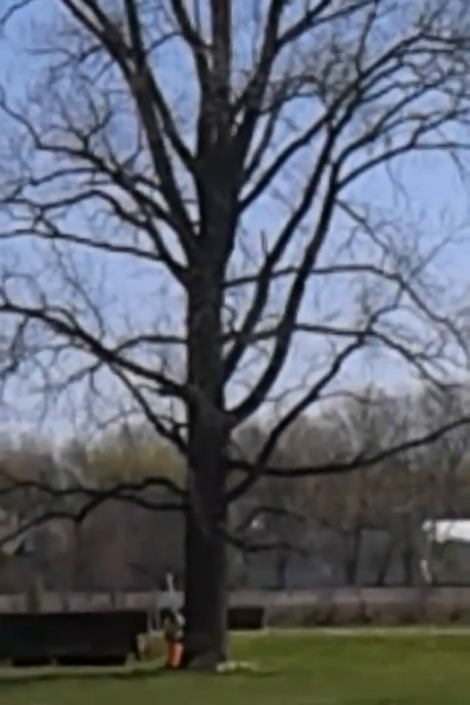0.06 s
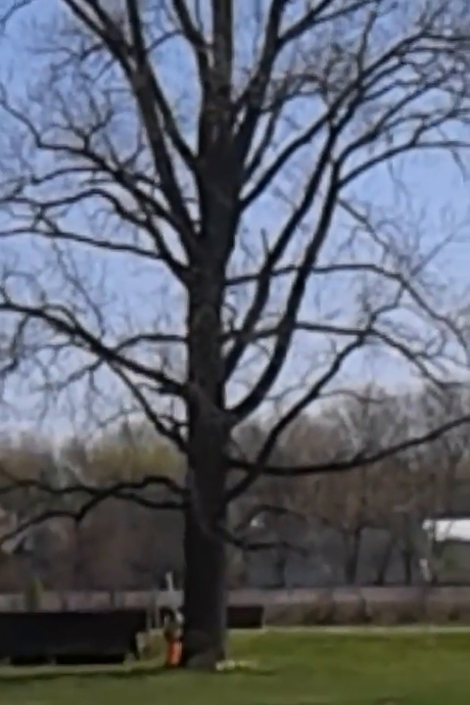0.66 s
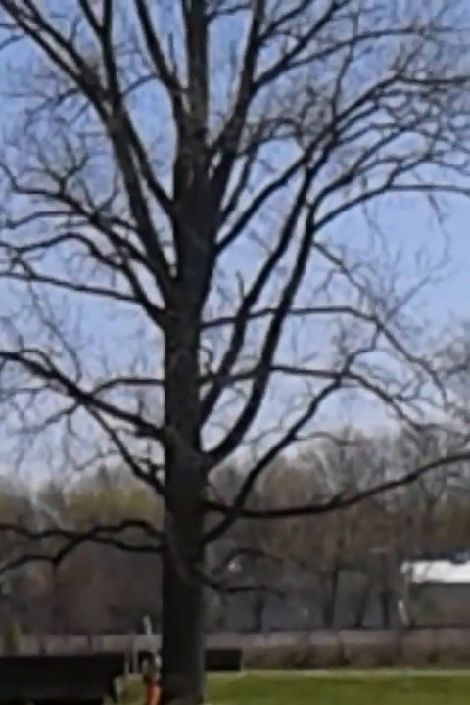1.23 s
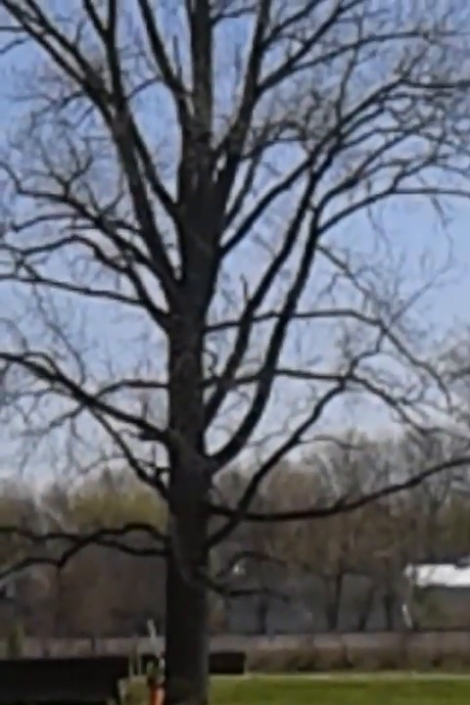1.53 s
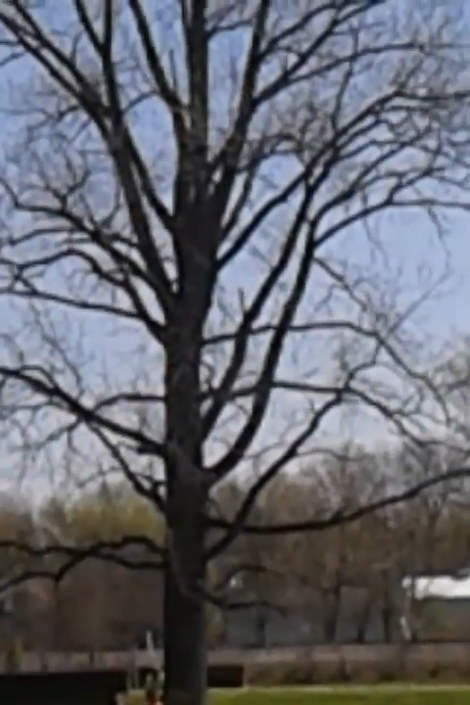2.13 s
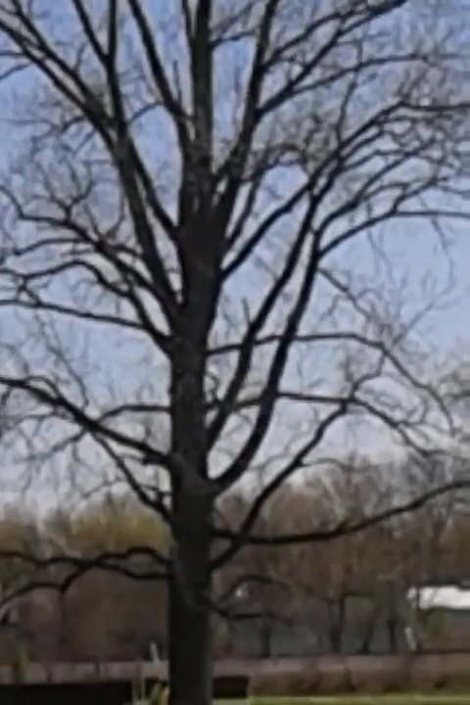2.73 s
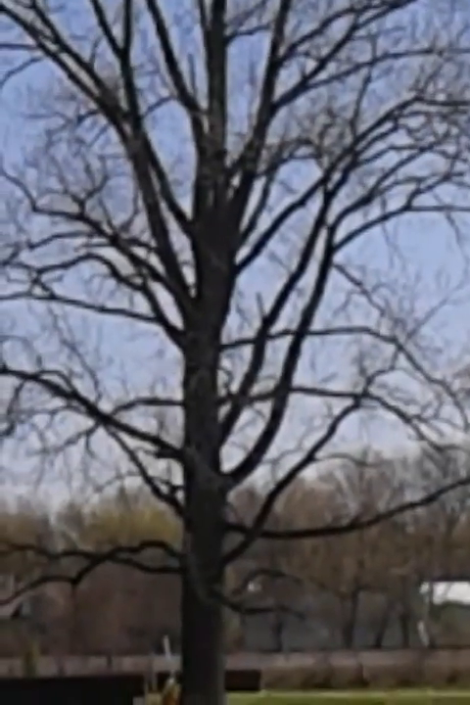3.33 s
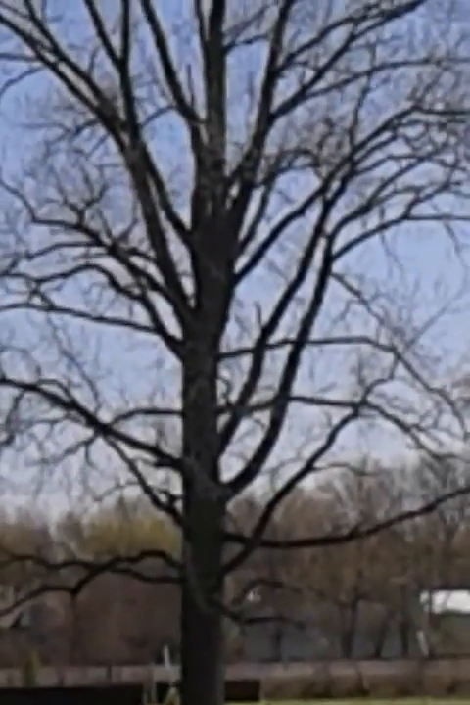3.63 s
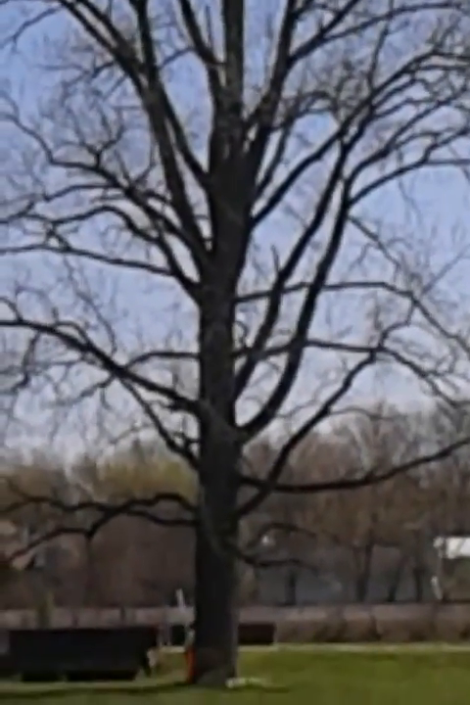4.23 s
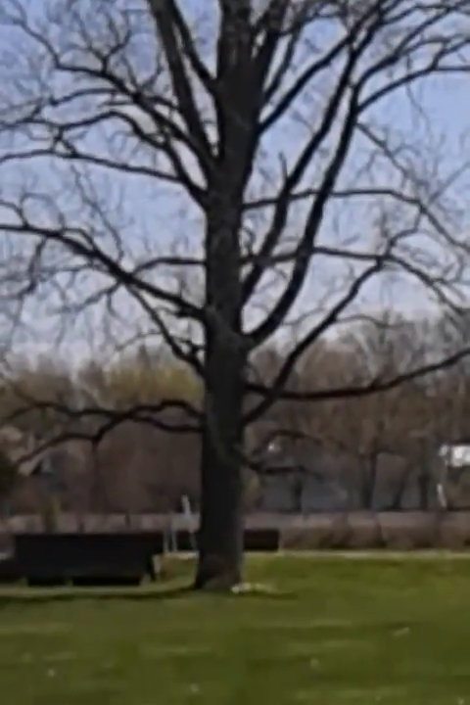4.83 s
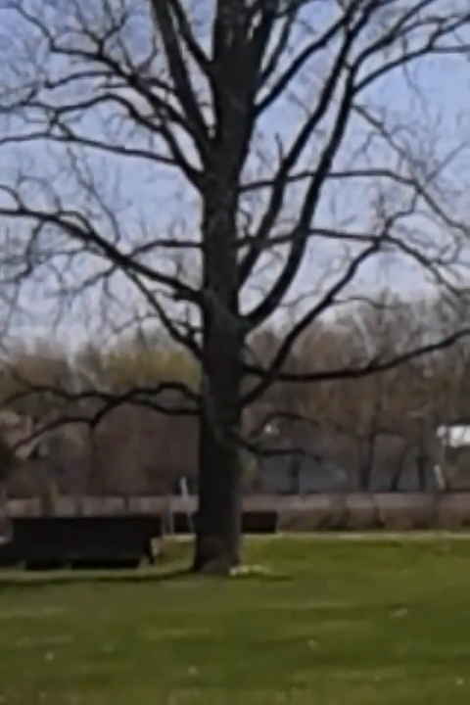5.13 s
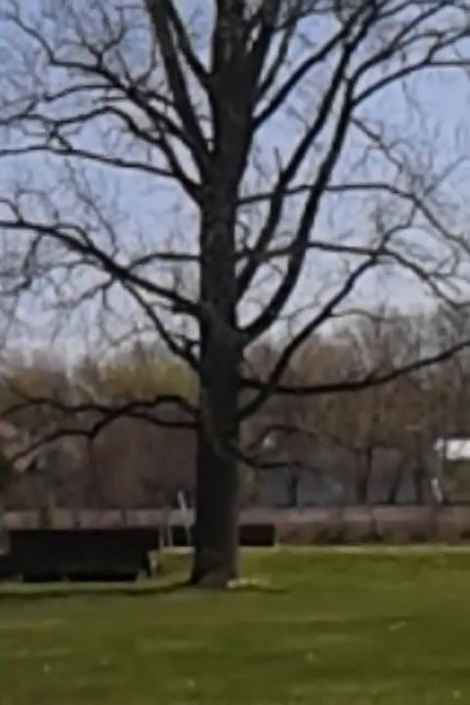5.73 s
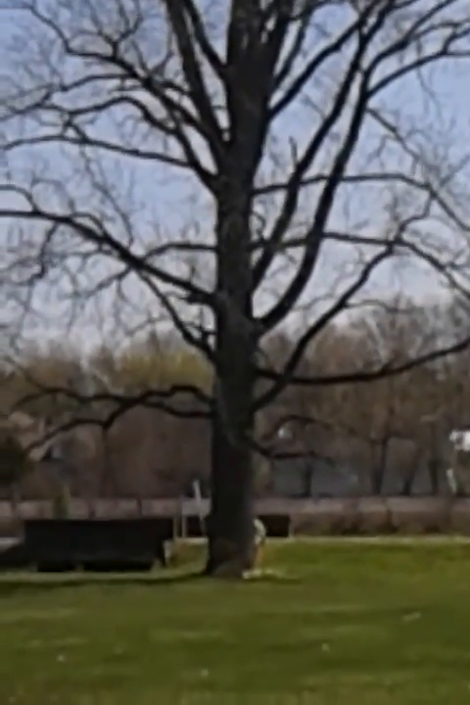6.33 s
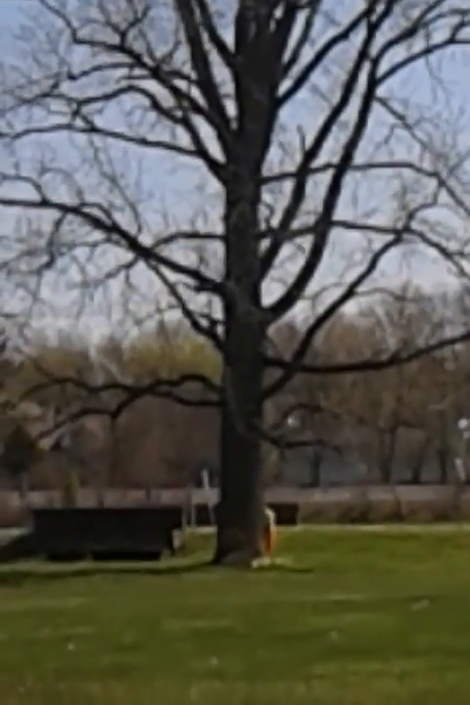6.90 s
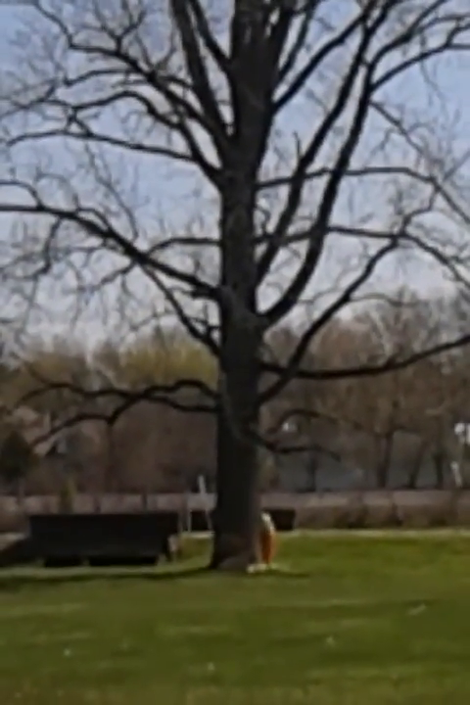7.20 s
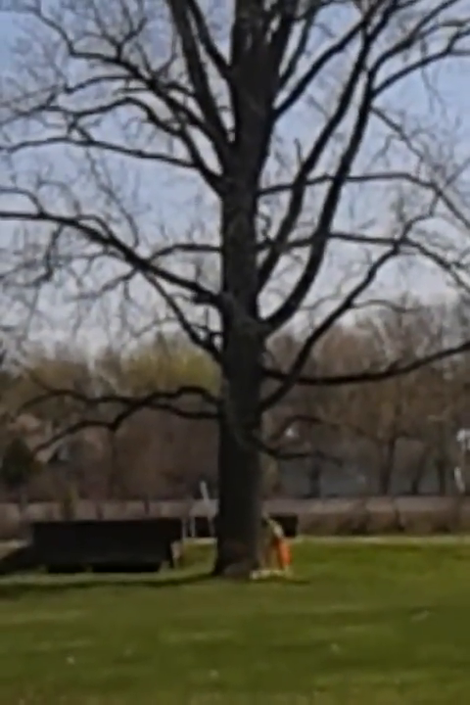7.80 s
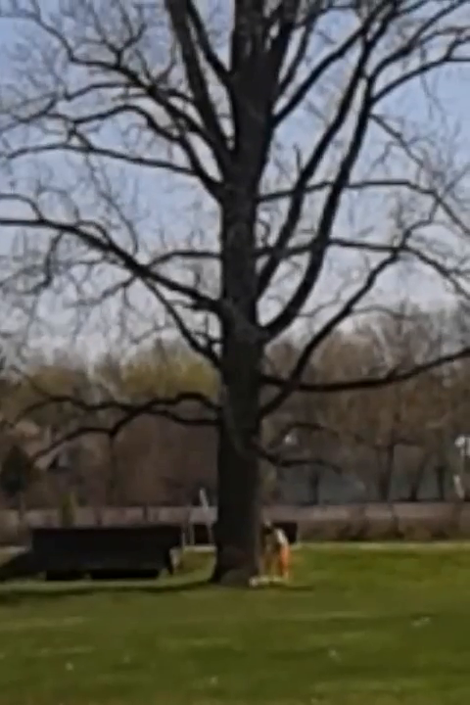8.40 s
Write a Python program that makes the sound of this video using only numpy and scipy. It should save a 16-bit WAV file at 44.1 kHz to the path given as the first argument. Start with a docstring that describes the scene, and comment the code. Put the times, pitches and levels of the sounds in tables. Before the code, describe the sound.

A distant chainsaw revs and sags in a cut, drops briefly to idle, then revs up again, with small handling clicks on the microphone.

```python
"""A lawn edged with trees, a two-stroke chainsaw at work on a big trunk on the far side. It sags in the
cut, drops to idle and revs up again and again: the exhaust booms and barks with each firing, the chain
rasps, the drive whines and the pinched bar squeals. A distant bird chirps faintly in the lull.
Right at the mono microphone, fingers scuff the camera, click on its case and thump the microphone."""
import sys
import numpy as np
from scipy import signal
from scipy.fft import rfft, irfft, next_fast_len
from scipy.io import wavfile
from scipy.ndimage import uniform_filter1d

SR = 44100
rng = np.random.default_rng(int(sys.argv[2]) if len(sys.argv) > 2 else 0)


def store_wav(level_fs):
    """Save 16-bit WAV to argv[1]."""
    pcm = np.round(np.clip(np.atleast_2d(level_fs), -1, 1) * 32767)
    wavfile.write(sys.argv[1], SR, pcm.T.astype(np.int16))


N = 377055
TIME = np.arange(N) / SR

# Engine speed, one firing per turn. Each row: time in seconds, turns per second.
ENGINE_SPEED = [(0.0, 156.5), (0.2, 134.5), (0.5, 100), (0.66, 84), (0.78, 82), (0.98, 115.8),
                (1.14, 131.5), (1.33, 119), (1.48, 123.5), (1.65, 120.5), (2.04, 183.0), (2.16, 162.2),
                (2.26, 174.4), (2.4, 173.0), (2.55, 178.0), (2.6, 153), (2.82, 84), (2.9, 68), (3.15, 45),
                (3.42, 45), (3.51, 79), (3.66, 79.6), (3.75, 91), (4.1, 139), (4.25, 163), (4.38, 187),
                (4.66, 112.2), (5.2, 199.3), (5.42, 196.5), (5.6, 202.5), (5.8, 204.0), (5.92, 133),
                (6.05, 95), (6.17, 60), (6.27, 80.8), (6.39, 82.2), (6.5, 107), (6.68, 155), (6.8, 152),
                (6.91, 113.2), (7.18, 187), (7.25, 195), (7.35, 185.0), (7.44, 199.2), (7.69, 203.0),
                (7.8, 213.5), (7.9, 206.5), (8.01, 200.5), (8.12, 204.0), (8.18, 203.7), (8.29, 197.2),
                (8.55, 196.2)]
# The saw's boom, bark and chain each swell and fade in loudness.
# Each row: time in seconds, then gains in dB for the boom, the bark, and the chain with its whine.
SAW_SWELLS = [(0, 3.5, 4, -2.5), (.25, 4, 4.5, -0.5), (.5, 0, 2.5, -1.5), (.72, -4.5, -5.5, -6),
              (1.2, -1.5, -3, -3.3), (1.7, -1, 0, 1.5), (2.05, -0.5, -1, -2), (2.5, -6, 0.5, -1),
              (2.78, 1.5, 1.5, -2), (2.95, -9, -2, -5), (3.5, -2, -2.5, -6), (3.7, 0, -1.5, -0.5),
              (4.15, 1, -1.5, -3), (4.5, -1, -2.5, -4), (4.8, 1, -1.5, -1), (5.1, 2.5, 0, -5.5),
              (5.3, -9, 1, -4.5), (5.72, -1, 0, -3.5), (5.85, -3.5, -2, -2.5), (6.15, -5, -2.5, -3.5),
              (6.35, 3, -4.5, -3.5), (6.65, 0.5, -3, 1), (6.8, -5, -5.5, -2), (7.05, 2, -4, -3.5),
              (7.25, -7, -7, -9), (7.5, -8, -7.5, -8.5), (7.8, -4.5, -2.5, -3.5), (7.95, 0, 0.5, -2.5),
              (8.18, 2.5, 3, -1), (8.32, -2.5, -0.3, -3.5), (8.55, -1.5, 1, -3.5)]
# The muffler shapes the overtones. Each row: frequency in Hz, gain in dB.
MUFFLER_RESPONSE = [(90, -9), (160, -2), (245, 1), (380, -5.5), (480, -6), (530, -11), (610, -8),
                    (690, -13), (735, -8), (800, -6), (870, -6.5), (1000, -9.5), (1230, -8), (1400, -10),
                    (1620, -9.5), (2100, -13)]
# Overtones of the firing. Each row: order, gain in dB pulling in the cut, gain in dB flat out.
FIRING_OVERTONES = [(2, 0, 0), (3, 1, -2), (4, .5, 2), (5, -1.5, 0), (6, 1.5, -6), (7, 1, -4.5), (8, 1, -3),
                    (9, 0, -4.5), (10, 1.5, -8), (11, -1.5, -7), (12, -4.5, -5), (13, -3, -6)]
# Separate puffs ring the muffler's chambers. Each row: frequency in Hz, dB added to the overtones.
CHAMBER_RING = [(165, 4), (240, 2), (320, -4), (400, -6), (480, 1.5), (560, 2), (645, 6), (740, 6),
                (850, -3), (1300, -3)]
# The second overtone growls as the outlet swings about. Each row: time in seconds, gain in dB.
OUTLET_GROWL = [(0, 1.5), (.3, 2.5), (.55, 10), (.9, 9.5), (1.15, 5), (1.7, 5), (2.6, 2), (2.72, 1),
                (2.82, 9.5), (2.92, -10), (3.65, 0.5), (4.1, -1), (5.4, -5.5), (5.65, 0), (6.15, -3),
                (6.35, 11.5), (6.5, 11), (6.68, -0.5), (8.55, -3)]
# Brief dips of the boom. Each row: centre in seconds, width in seconds, gain in dB.
BOOM_DIPS = [(.12, 0.046, -5), (1.352, .05, 0), (2.16, .07, -7), (4.57, .05, -8), (6.735, 0.034, -17),
             (7.054, 0.033, -13), (7.11, 0.021, -9), (7.222, .04, -10), (7.4, .05, -5), (7.5, 0.048, -12)]
# Rough gas flow from the exhaust. Each row: frequency in Hz, relative noise density in dB.
GAS_SPECTRUM = [(25, -20), (55, -3), (90, 7), (160, -1), (230, -7), (330, -9), (450, -7), (580, -1.5),
                (850, -1), (1100, -4), (1400, -3), (1900, -4.5), (2600, -9), (4000, -28)]
# The chain runs in the bar and tears wood. Each row: frequency in Hz, relative noise density in dB.
CHAIN_SPECTRUM = [(1200, -11.5), (2000, -12), (2450, -9.5), (2950, -4.5), (3400, -3.5), (3900, -4.5),
                  (4700, -2.5), (5450, 0), (5900, -3), (6400, -9), (7600, -8.5), (9000, -17), (10300, -24),
                  (11200, -50)]
# Ringing of the muffler shell and cylinder. Each row: frequency in Hz, gain in dB.
SHELL_RESPONSE = [(1700, -14), (2300, -14), (2480, -13), (2620, -4.5), (2690, -9), (2770, 1), (2860, 2),
                  (2930, -5), (3060, 1), (3220, -2.5), (3460, -5), (3750, -14), (4450, -11), (4700, -3),
                  (5000, -8), (5280, -1.5), (5600, -7), (5900, -8), (6400, -22)]
# The drive whines hardest at twice the tooth rate of its seven-tooth sprocket.
# Each row: order, gain in dB.
WHINE_ORDERS = [(14, 0), (15, -.5), (16, -1.5), (17, -1.5), (18, -2), (20, -4), (26, -2)]
# The pinched bar. Each row: start and length in seconds, first pitch, last pitch and width in Hz,
# level in dB.
BAR_SQUEALS = [(1.72, .39, 2980, 3140, 30, -40.5), (1.72, .96, 5350, 5260, 80, -43.5),
               (2.195, .055, 4380, 4400, 40, -39)]
# Fingers slide on the case. Each row: start in seconds, rough length in seconds, level in dB.
FINGER_SCUFFS = [(0.298, 0.018, -18.5), (0.3473, 0.014, -15), (0.378, 0.017, -34), (0.454, 0.033, -35.5),
                 (0.557, 0.013, -29.5), (0.585, 0.038, -38), (3.039, 0.0078, -43)]
# Skin rubbing on the case. Each row: frequency in Hz, relative noise density in dB.
SCUFF_SPECTRUM = [(60, 3.5), (300, -1), (900, -5.5), (2000, -7.5), (3500, -2), (5300, 6.5), (6500, -3.5),
                  (9000, -16.5), (14500, -18)]
# Sharp snaps of the case. Each row: start in seconds, relative level in dB.
CASE_SNAPS = [(.2989, 0), (.329, -20), (.3488, -9), (.5563, -21), (3.039, -26), (5.686, -16)]
# Small ticks of the case. Each row: start in seconds, peak in dB, ring in Hz, decay in seconds.
CASE_TICKS = [(5.6856, -15, 3930, 0.0012), (5.6855, -20, 5800, 0.0017), (5.6852, -15, 8860, 0.00087),
              (5.6853, -19, 12400, 0.00089), (7.6783, -19, 4750, 0.0024), (7.682, -15, 6500, 0.0051),
              (7.7, -16, 6500, 0.006), (7.759, -21.5, 5300, 0.0035), (7.85, -18.5, 5200, .005),
              (7.858, -18.5, 6400, 0.0065), (3.091, -39.5, 3800, 0.0046), (3.392, -42, 950, 0.0034)]
# Knocks on the microphone. Each row: start in seconds, strength in dB, dB added for the case's clack.
MIC_KNOCKS = [(6.5931, 1, -18), (6.8582, 7, 11.5), (7.5334, -4, -14)]
# The distant bird. Each row: start in seconds, first pitch in Hz, level in dB, number of notes.
BIRD_PHRASES = [(3.258, 4950, -44, 3), (3.601, 4900, -38, 2), (3.766, 4620, -36, 1), (3.94, 4620, -37.5, 3)]
# Still air over the lawn. Each row: frequency in Hz, relative noise density in dB.
AIR_SPECTRUM = [(25, -13.5), (70, 8), (180, 7), (420, -7.5), (950, -3), (1800, -10.5), (5000, -10),
                (9000, -20.5), (14500, -59)]

# Each part grows with the revs. Each law: dB flat out, dB per octave of speed, dB added when coasting,
# dB added at idle.
BOOM_LAW, BARK_LAW = (-31.5, 13, -9.5, -37), (-44.5, 9.5, 3, -10.5)
RASP_LAW, WHINE_LAW = (-31.5, 10.5, -0.26, -1), (-36.5, 21, -5, -6)
IDLE_SPEED, CLUTCH_SPEED, FULL_SPEED = 55, 76, 200   # turns per second
BEHIND_TRUNK_S = (3.0, 4.2, 7.3, 7.9)   # the saw starts to go behind, is hidden, starts out, is clear
RUNNING_LIGHT_S = (5.25, 5.5, 5.7)   # the chain runs without load: start, height, end
MIC_BASS_CUT_HZ = 60
TOP_CUT_HZ = 15100   # the highest treble is cut off steeply


def chainsaw():
    """The saw across the lawn: one crank times the exhaust, chain and drive; the trunk shades the top."""
    speed, = in_time(ENGINE_SPEED)
    octaves, coasting, idling = effort(speed)
    boom_db, bark_db, rasp_db, whine_db = (
        full_db + octave_db * octaves + coast_db * coasting + idle_db * idling
        for full_db, octave_db, coast_db, idle_db in (BOOM_LAW, BARK_LAW, RASP_LAW, WHINE_LAW))
    boom_swell_db, bark_swell_db, chain_swell_db = in_time(SAW_SWELLS)
    speed = speed * (1 + .001 * drift(14))
    turns = np.cumsum(speed) / SR
    hidden = np.interp(TIME, BEHIND_TRUNK_S, [0, 1, 1, 0])
    whine = from_db(whine_db + chain_swell_db - 9 * hidden) * drive_whine(turns, speed)
    whine = treeline(whine, t60=.3, wet_db=-13)
    rasp = from_db(rasp_db + chain_swell_db) * chain(turns, hidden, flutter_db=.9, dull_db=-14.5)
    boom = exhaust_boom(turns, boom_db + boom_swell_db)
    bark = from_db(bark_db + bark_swell_db) * exhaust_bark(turns, speed, coasting, idling)
    return boom + bark + rasp + whine + bar_squeals()


def effort(speed):
    """Octaves from full speed, coasting (0-1, revs falling with the trigger let go) and idling (0-1)."""
    slowing = -uniform_filter1d(np.gradient(speed) * SR, SR // 8)   # turns per second lost each second
    slowing_ahead = np.interp(TIME + .016, TIME, slowing)   # the firing weakens before the revs fall
    coasting = np.clip((slowing_ahead - 135) / 110, 0, 1)
    near_idle = np.interp(speed, [IDLE_SPEED, CLUTCH_SPEED], [1, 0])
    lag = np.exp(-1 / (.025 * SR))   # the engine swells out of idle
    idling = signal.lfilter([1 - lag], [1, -lag], near_idle + 1e-18)
    return np.log2(np.minimum(speed / FULL_SPEED, 1)), coasting, idling


def exhaust_boom(turns, level_db):
    """A clean note at the firing rate; running light, every other firing is weak and it burbles."""
    angle = 2 * np.pi * turns
    dips_db = sum(db * np.exp(-(2 * (TIME - s) / width) ** 2) for s, width, db in BOOM_DIPS)
    boom = np.sqrt(2) * from_db(level_db + 1.56 * drift(11) + dips_db) * np.cos(angle)
    unloaded = np.interp(TIME, RUNNING_LIGHT_S, [0, 1, 0])
    burble = unloaded * from_db(-47 + 2.6 * drift(18)) * np.cos(angle / 2 + drift(10))
    return boom + burble


def exhaust_bark(turns, speed, coasting, idling):
    """Wavering overtones shaped by the muffler, with rough gas between them; coasting, they sputter."""
    flat_out = np.interp(speed, [150, 200], [0, 1])
    # Pulling at low revs, the gas leaves in separate puffs.
    putter = np.interp(speed, [90, 125], [1, 0]) * (1 - coasting) * (1 - idling)
    # Each firing comes a little early or late.
    jitter_rad = (np.interp(flat_out, [0, 1], [.065, .045]) + .25 * coasting) * drift(60)
    angle = 2 * np.pi * turns + jitter_rad
    growl_db, = in_time(OUTLET_GROWL)
    growl, upper = 0, 0
    for order, pulling_db, flat_out_db in FIRING_OVERTONES:
        hz = order * speed
        level_db = pulling_db + (flat_out_db - pulling_db) * flat_out + 2.6 * drift(14)
        level_db += at_hz(MUFFLER_RESPONSE, hz) + putter * at_hz(CHAMBER_RING, hz)
        level_db -= (7 if order == 2 else 12) * coasting
        overtone = np.sqrt(2) * from_db(level_db) * np.cos(order * (angle + .05 * drift(7.8)))
        if order == 2:
            growl = overtone * from_db(growl_db)
        else:
            upper += overtone
    gas_db = np.interp(flat_out, [0, 1], [-2.2, -6]) + 2.5 * coasting
    gas = from_db(gas_db) * coloured(puffs(turns, depth=.092 + .55 * putter), GAS_SPECTRUM)
    upper *= from_db(2.2 * drift(50))   # each firing is stronger or weaker than the last
    return growl + gas + treeline(upper, t60=.46, wet_db=-.5)


def puffs(turns, depth):
    """Noise that swells once per turn of the crank."""
    return rng.standard_normal(N) * (1 + depth * np.cos(2 * np.pi * turns))


def chain(turns, hidden, flutter_db, dull_db):
    """Cutters rasp in time with the engine; the top fades as the saw passes behind the trunk."""
    rasp = coloured(puffs(turns, depth=.068), CHAIN_SPECTRUM) * from_db(flutter_db * drift(25))
    top = butterworth(rasp, 4400, "high", order=1)
    return rasp + (from_db(dull_db * hidden) - 1) * top


def drive_whine(turns, speed):
    """High orders of the drive swell as they sweep through the ringing metal; higher ones waver more."""
    out = 0
    for order in range(14, 37):
        level_db = at_hz(SHELL_RESPONSE, order * speed) + np.interp(order, *np.transpose(WHINE_ORDERS))
        waver_db = order / 10 * drift(14) + 1.5 * drift(5)
        wander_rad = rng.uniform(0, 2 * np.pi) + order / 52 * drift(20)
        out += from_db(level_db + waver_db) * np.cos(2 * np.pi * order * turns + wander_rad)
    return np.sqrt(2) * out


def bar_squeals():
    """Pinched in the cut, the bar rings in narrow, restless bands that swell and fade."""
    out = 0
    for start, length, first_hz, last_hz, width_hz, db in BAR_SQUEALS:
        progress = np.clip((TIME - start) / length, 0, 1)
        angle = 2 * np.pi * np.cumsum(first_hz + (last_hz - first_hz) * progress) / SR
        ring = drift(width_hz) * np.cos(angle) + drift(width_hz) * np.sin(angle)
        out += from_db(db) * np.sqrt(np.abs(np.sin(np.pi * progress))) * ring
    return out


def finger_scuffs():
    """Fingers slide on the camera case, a grainy rub right beside the microphone."""
    pressure = 0
    for start, length, db in FINGER_SCUFFS:
        stroke = np.interp(TIME - start, [0, .001, .66 * length, 1.4 * length], [.0013, .98, .63, .00041])
        pressure += from_db(db) * stroke
    grain = rng.standard_normal(N) * from_db(drift(500))
    return pressure * coloured(grain, SCUFF_SPECTRUM)


def case_snaps():
    """The case snaps sharply, and each snap also knocks its hollow."""
    starts, db = np.transpose(CASE_SNAPS)
    pulses = clicks(np.round(starts * SR) / SR, from_db(db))
    snaps = resonance(butterworth(pulses, 5500, "low", order=2), hz=2500, width_hz=4000)
    hollow = resonance(clicks(starts, from_db(db)), hz=800, width_hz=680)
    return snaps / np.abs(snaps).max() + from_db(-11) * hollow / np.abs(hollow).max()


def case_ticks():
    """Tiny rubs set the case ringing for a few milliseconds."""
    out, t = np.zeros(N), TIME[:SR // 10]
    for s, db, hz, decay in CASE_TICKS:
        rub = rng.standard_normal(len(t)) * np.exp(-t / decay)
        ring = resonance(rub, hz, width_hz=.095 * hz)
        ring = butterworth(ring, min(1.38 * hz, TOP_CUT_HZ), "low", order=3)
        start = int(s * SR)
        out[start:start + len(t)] += from_db(db) * ring / np.abs(ring).max()
    return out


def mic_thumps(leak_hz):
    """A knock is a pressure step that leaks away and swings in the bass cut, with a clack of the case."""
    starts, db, clack_db = np.transpose(MIC_KNOCKS)
    steps = signal.lfilter([1], [1, -np.exp(-2 * np.pi * leak_hz / SR)], clicks(starts, from_db(db)))
    steps = butterworth(steps, 4000, "low", order=1)
    thump = butterworth(steps, MIC_BASS_CUT_HZ, "high", order=6)
    clack = resonance(clicks(starts, from_db(db + clack_db)), hz=2000, width_hz=1400)
    return thump + butterworth(clack, 3300, "low", order=2)


def bird(note_s, gap_s, fall):
    """A distant bird sings short runs of quick, falling chirps that step down in pitch."""
    out, progress = np.zeros(N), np.linspace(0, 1, int(note_s * SR))
    for s, first_hz, db, notes in BIRD_PHRASES:
        for note in range(round(notes)):
            start = int((s + note * gap_s) * SR)
            hz = first_hz * .96 ** note * (1 + .02 * rng.standard_normal())
            angle = 2 * np.pi * np.cumsum(hz * (1 - fall * progress)) / SR
            out[start:start + len(progress)] += from_db(db) * np.sin(np.pi * progress) * np.sin(angle)
    return out


def treeline(x, t60, wet_db):
    """Trees and ground scatter back a dull tail that smears the glides, at the direct sound's cost."""
    t = TIME[:SR]
    tail = butterworth(rng.standard_normal(SR), 2400, "low", order=1)
    tail *= from_db(-60 * t / t60) * (t > .012)
    scattered = signal.fftconvolve(x, tail / np.linalg.norm(tail))[:N] / 2
    wet = from_db(wet_db)
    return (x + wet * scattered) / np.sqrt(1 + wet ** 2)


def lawn_air():
    """The faint, steady hush of still air all round the microphone."""
    return from_db(-52.5) * coloured(rng.standard_normal(N), AIR_SPECTRUM)


def from_db(db):
    return 10 ** (np.asarray(db) / 20)


def unit_rms(x):
    return x / np.sqrt(np.mean(x ** 2) + 1e-20)


def in_time(rows):
    """Columns of a table as continuous controls."""
    seconds, *columns = np.transpose(rows)
    return [np.interp(TIME, seconds, column) for column in columns]


def at_hz(spectrum, hz):
    """Read a spectrum in dB on a log-frequency axis."""
    points_hz, db = np.transpose(spectrum)
    return np.interp(np.log(hz + 1e-9), np.log(points_hz), db)


def coloured(x, spectrum):
    """Shape x with a spectrum that falls away beyond its ends; rms 1."""
    size = next_fast_len(N)
    hz = np.arange(size // 2 + 1) * SR / size
    ends = np.minimum(hz / spectrum[0][0], 1) ** 2 / np.maximum(hz / spectrum[-1][0], 1) ** 4
    return unit_rms(irfft(rfft(x, size) * from_db(at_hz(spectrum, hz)) * ends, size)[:N])


def drift(rate_hz):
    """Smooth random wander of rms 1, mostly slower than rate_hz."""
    hop, settle = 40, 2000
    pole = np.exp(-2 * np.pi * rate_hz * hop / SR)
    noise = rng.standard_normal(N // hop + settle + 2)
    slow = signal.lfilter([1], [1, -2 * pole, pole * pole], noise)[settle:]
    return np.interp(np.arange(N) / hop, np.arange(len(slow)), unit_rms(slow))


def resonance(x, hz, width_hz):
    """Two-pole resonance, gain 1 at its peak."""
    r = np.exp(-np.pi * width_hz / SR)
    poles = [1, -2 * r * np.cos(2 * np.pi * hz / SR), r * r]
    return signal.lfilter(np.array([1, 0, -1]) * (1 - r * r) / 2, poles, x + 1e-18)


def butterworth(x, hz, kind, order):
    return signal.sosfilt(signal.butter(order, hz, kind, fs=SR, output="sos"), x + 1e-18)


def clicks(seconds, sizes):
    """Single pulses, each shared between the two nearest samples."""
    at, out = np.clip(np.asarray(seconds) * SR, 0, N - 2), np.zeros(N)
    whole = at.astype(int)
    np.add.at(out, whole, sizes * (1 - at + whole))
    np.add.at(out, whole + 1, sizes * (at - whole))
    return out


def scene():
    """The saw and bird far off in open air, the handling right at the mono microphone."""
    saw = chainsaw()
    chirps = treeline(bird(note_s=.009, gap_s=.025, fall=.13), t60=.22, wet_db=2)
    air = lawn_air()
    handling = finger_scuffs() + case_snaps() + case_ticks() + mic_thumps(leak_hz=71)
    mono = saw + chirps + air + handling
    return np.array([mono, mono])


def record(dry):
    """The loudest knocks overload; the highest treble is cut off steeply."""
    top_cut = signal.cheby2(18, 75, TOP_CUT_HZ + 600, fs=SR, output="sos")
    return signal.sosfilt(top_cut, np.clip(dry, -.93, .93))


dry = scene()
out = record(dry)
store_wav(out)
```